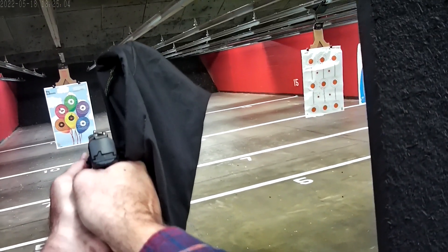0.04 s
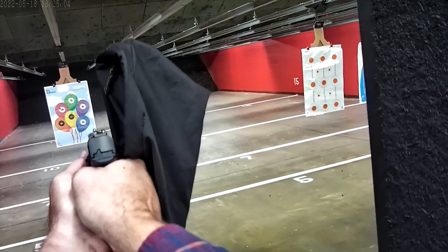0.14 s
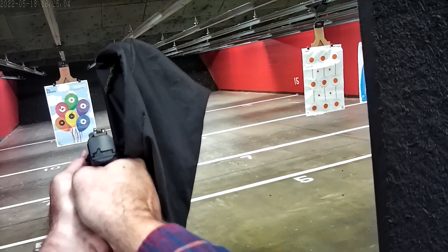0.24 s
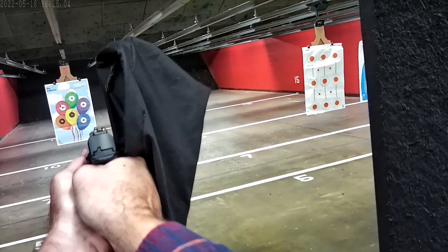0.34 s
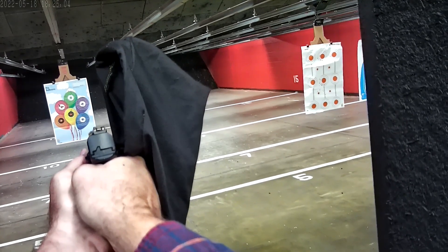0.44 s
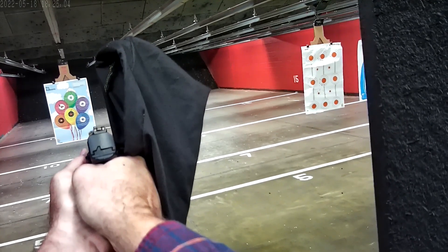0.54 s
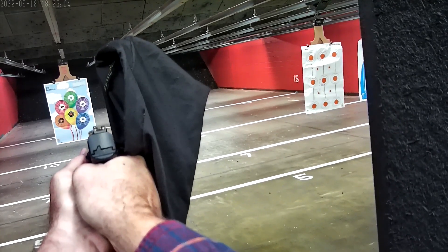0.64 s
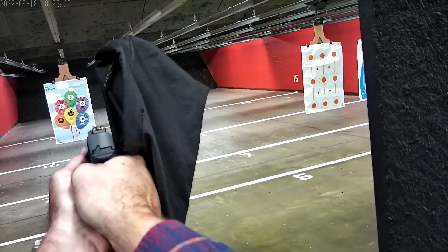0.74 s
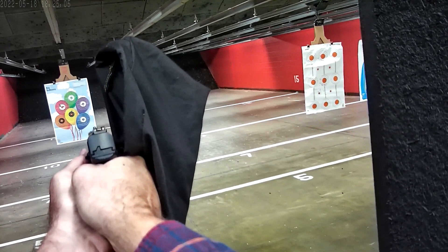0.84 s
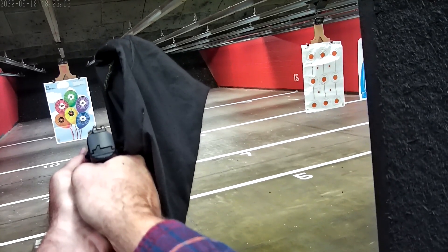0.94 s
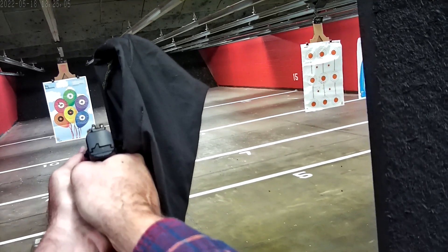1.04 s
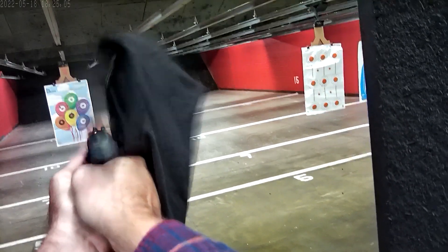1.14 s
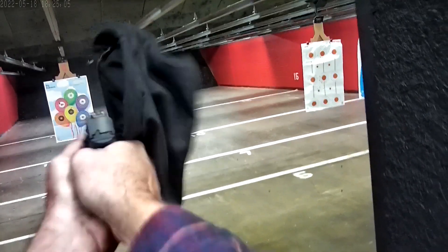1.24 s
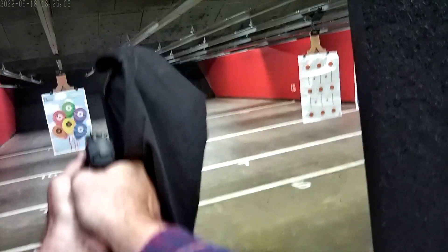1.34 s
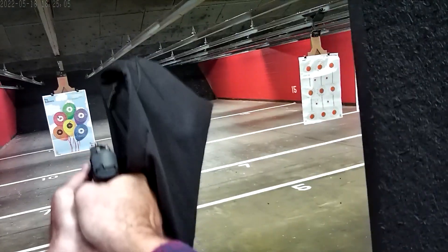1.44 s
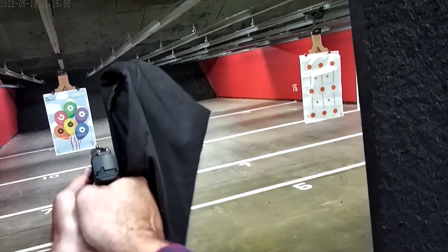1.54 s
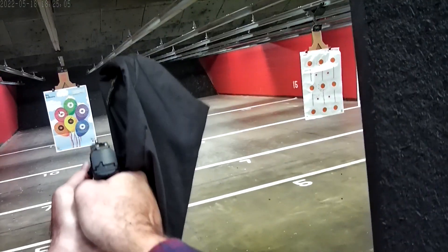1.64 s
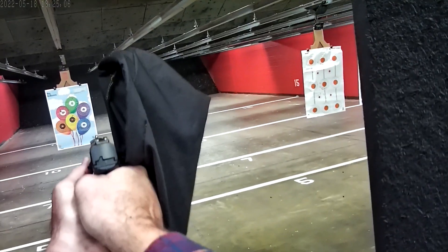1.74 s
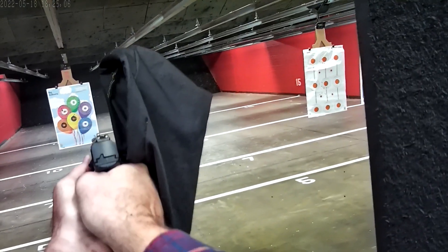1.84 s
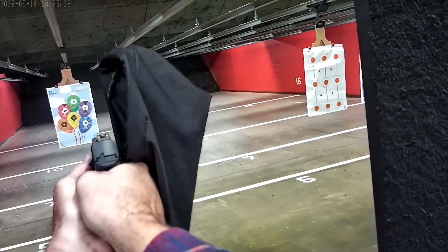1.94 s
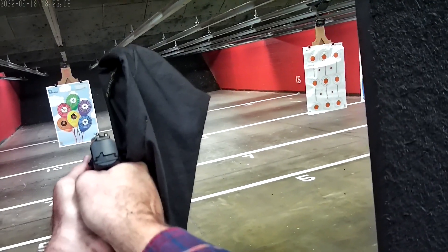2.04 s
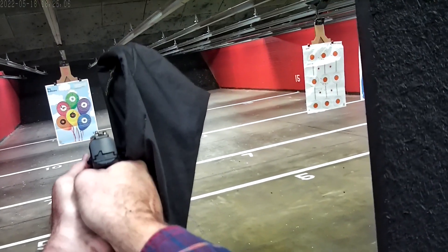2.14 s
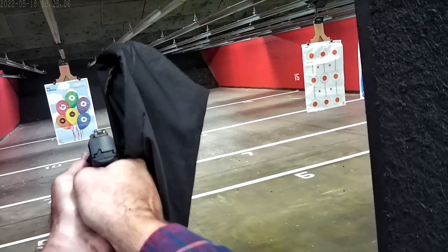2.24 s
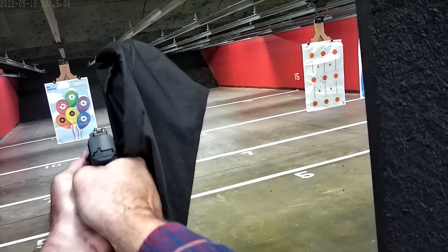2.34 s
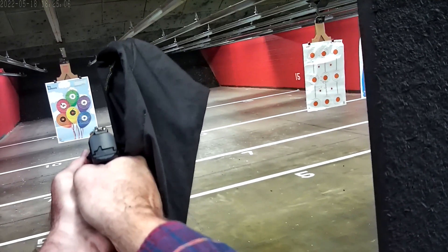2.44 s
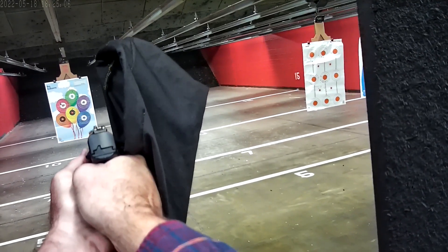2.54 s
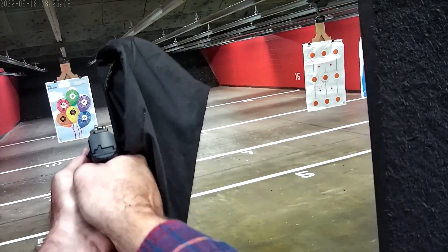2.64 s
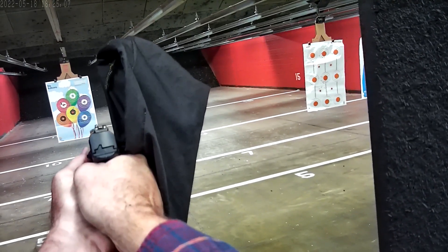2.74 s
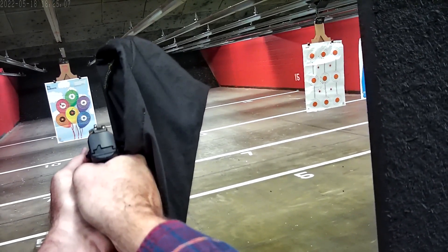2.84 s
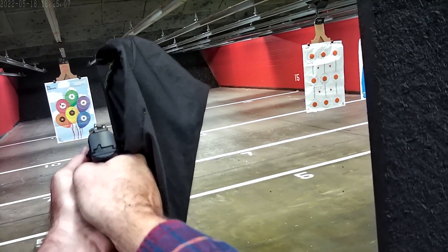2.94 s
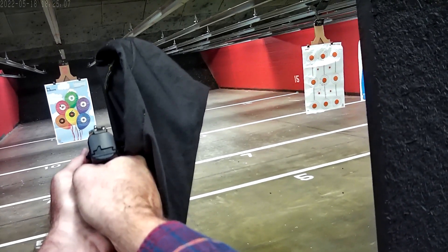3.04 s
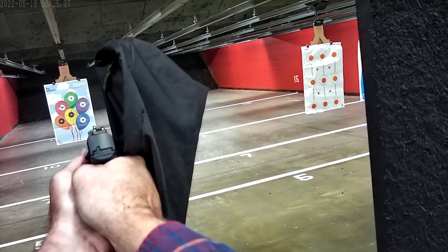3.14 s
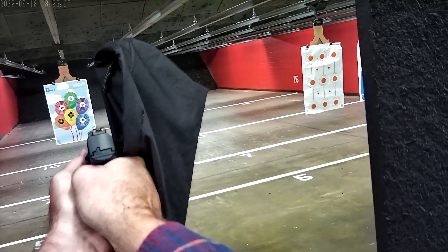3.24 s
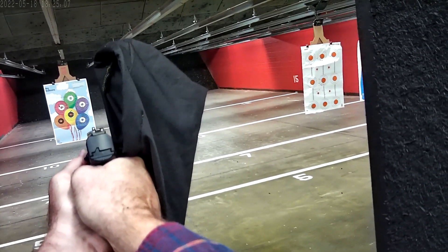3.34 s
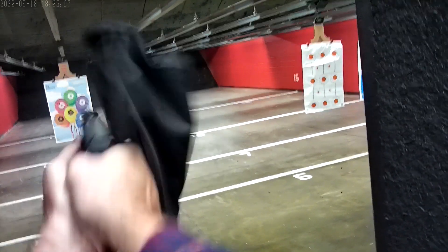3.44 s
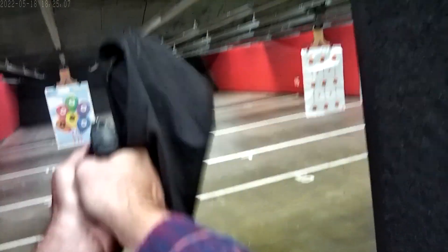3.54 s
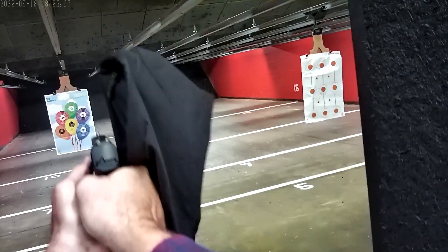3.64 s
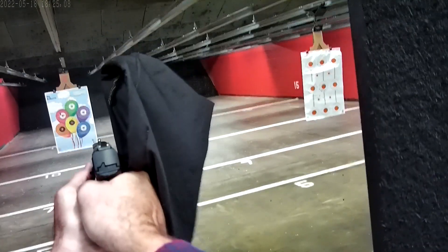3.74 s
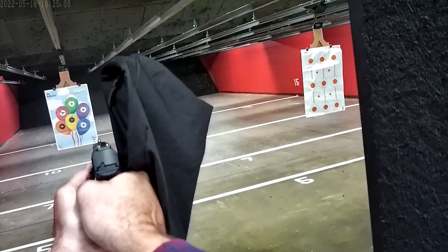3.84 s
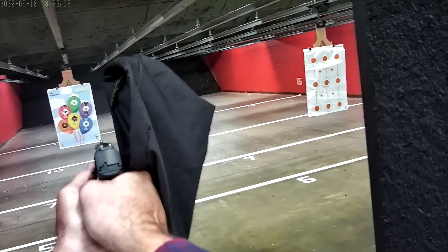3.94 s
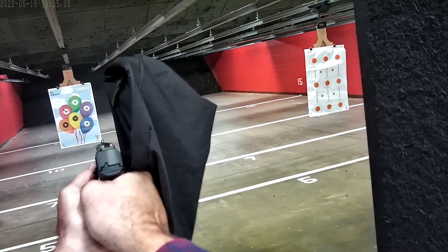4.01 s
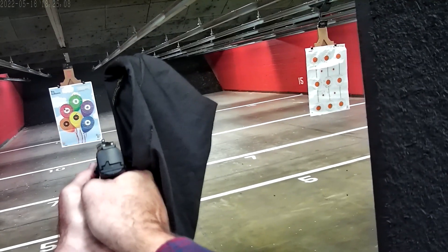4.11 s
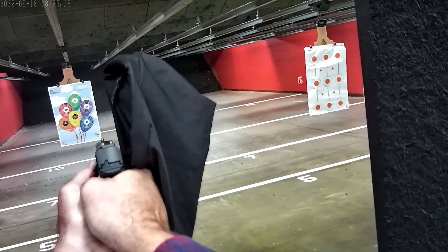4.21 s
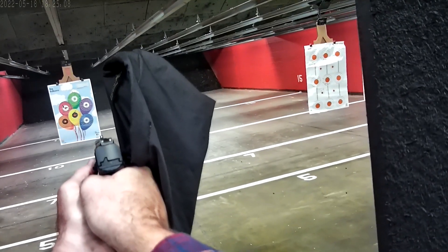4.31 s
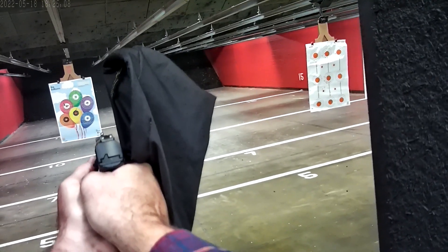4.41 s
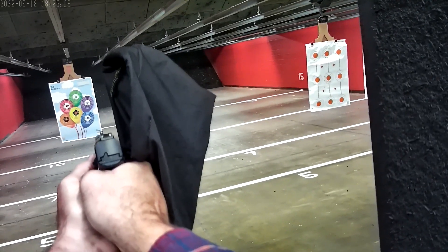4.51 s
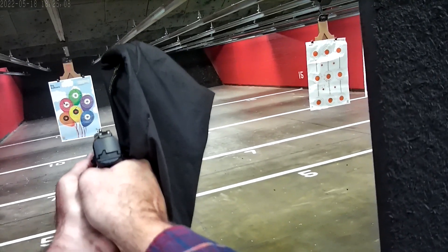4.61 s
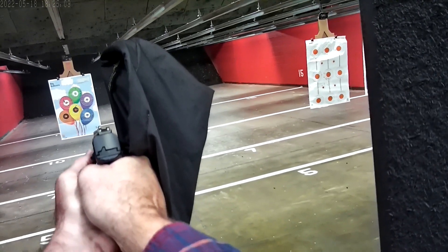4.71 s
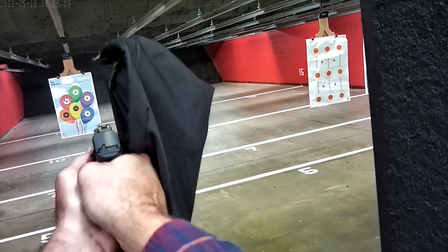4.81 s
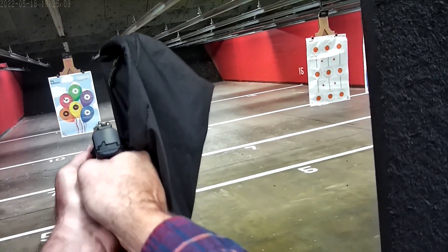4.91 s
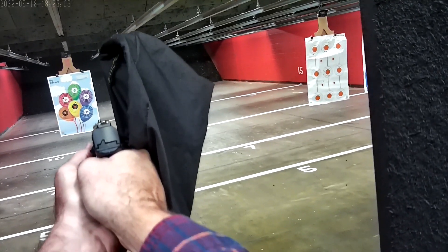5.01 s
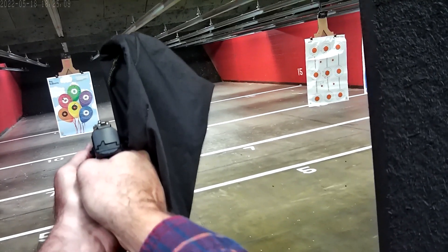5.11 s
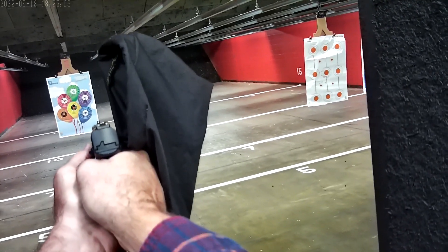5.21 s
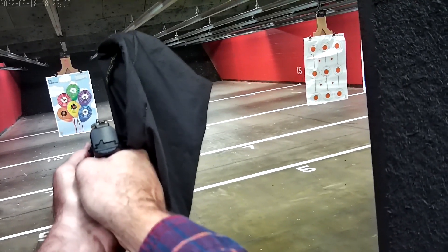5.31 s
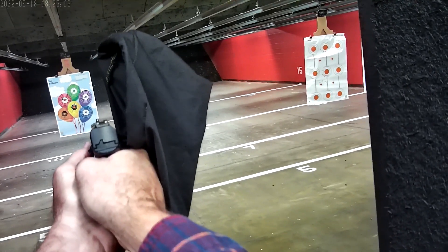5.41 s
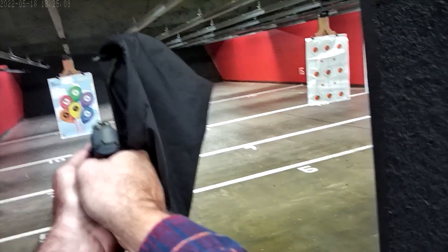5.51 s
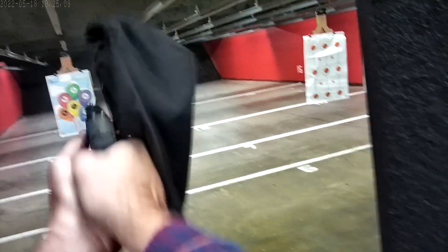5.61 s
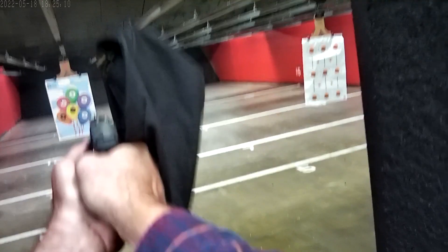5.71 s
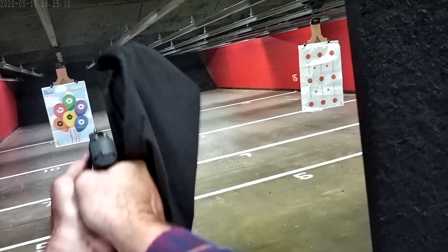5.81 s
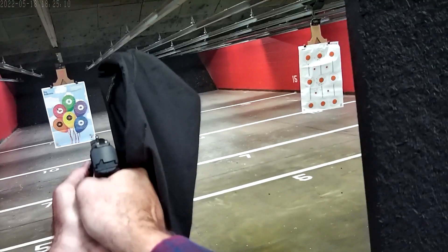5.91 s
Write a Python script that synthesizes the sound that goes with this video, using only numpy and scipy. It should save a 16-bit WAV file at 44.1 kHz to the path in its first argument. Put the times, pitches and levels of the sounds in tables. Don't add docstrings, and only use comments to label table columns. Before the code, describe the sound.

Close, overloaded microphone at a firing booth: two duller shots next door and one sharp handheld shot within the first second or so, another neighbour shot, a handheld shot, then a long pause of fading echo and bouncing brass before a final near-then-neighbour pair. Thick short booth reverb gives way to a slapping hall tail. Steady low air rush and faint hiss lie underneath.

```python
import sys
import numpy as np
from scipy import signal
from scipy.fft import rfft, irfft, next_fast_len
from scipy.io import wavfile
from scipy.ndimage import uniform_filter1d

SR = 44100
rng = np.random.default_rng(int(sys.argv[2]) if len(sys.argv) > 2 else 0)


def output_pcm(signal):
    pcm = np.clip(np.atleast_2d(signal).T, -1, 1) * 32767
    wavfile.write(sys.argv[1], SR, np.round(pcm).astype(np.int16))


def level_to_linear(level):
    exponent = np.asarray(level, float) / 20
    return 10 ** exponent


N = 262821
TIME = np.arange(N) / SR
COARSE = np.arange(0, N + 16, 16) / SR

# start in seconds, blast level in dB over the overload point,
# brightness in dB per octave (above 0 in the hands, below 0 hidden next door),
# hall level in dB, time the hall holds its level in seconds.
SHOTS = [
    (0.519, 7.7, -0.5, -29.5, 0.19),
    (0.672, 6.8, -0.36, -21, 0.4),
    (1.1222, 6.5, 1.1, -20.5, 0.45),
    (2.4269, 7.9, -0.39, -23, 0.59),
    (3.364, 7.85, 0.87, -20, 0.45),
    (5.5356, 6.6, 1.1, -27.5, 0.67),
    (5.696, 6.5, -0.43, -21, 0.75),
]


def table(points, hz):
    points = np.array(points)
    return np.interp(np.log(np.maximum(hz, 1)), np.log(points[:, 0]), points[:, 1])


def walk(rate):
    size = len(COARSE)
    hold = int(size / COARSE[-1] / rate)
    steps = np.repeat(rng.standard_normal(size // hold + 1), hold)
    smooth = uniform_filter1d(uniform_filter1d(steps, hold), hold)
    return 1.74 * smooth[:size]


def diffuse(colour, envelope):
    size = next_fast_len(N)
    hz = np.arange(size // 2 + 1) * SR / size
    noise = rfft(rng.standard_normal(size)) * level_to_linear(table(colour, hz))
    noise = noise / np.std(irfft(noise, size))
    place = 2 * np.log2(np.maximum(hz, 1) / 30)
    out = 0
    for k in range(19):
        overlap = np.maximum(1 - abs(place - k), 0)
        band = irfft(noise * overlap, size)[:N]
        out = out + band * np.interp(TIME, COARSE, envelope(30 * 2 ** (k / 2)))
    return out


def ring(x, hz, t60):
    pole = np.exp(2j * np.pi * hz / SR - np.log(1000) / (t60 * SR))
    return signal.lfilter([1], [1, -pole], x).imag


def since(s, clock=COARSE):
    return np.maximum(clock - s, 0), clock >= s


def ventilation():
    # frequency in Hz, level in dB per Hz.
    air_colour = [(18, -32.5), (30, -23.5), (50, -4.5), (76, -5), (165, -5), (246, -14), (460, -17),
                  (700, -19.5), (1900, -26), (2800, -42), (4500, -58.5), (7000, -86)]
    swell = walk(2.0)
    return level_to_linear(-46.5) * diffuse(air_colour, lambda hz: level_to_linear(0.4 * swell + 0.63 * walk(20)))


def hall():
    # frequency in Hz, level in dB per Hz.
    hall_colour = [(24, -29), (45, -1), (80, -1), (120, 3.5), (234, -16.5), (420, -11), (650, -15.5),
                   (1300, -7), (1800, -6.5), (2900, -27.5), (4000, -33), (5500, -50), (9500, -54),
                   (16000, -85)]
    # frequency in Hz, time to fade by 60 dB in seconds.
    hall_t60 = [(60, 2.5), (150, 1.1), (400, 1), (1500, 1.365), (4000, 1.93), (8000, 1.6), (14000, .7)]
    leftover_db = -48
    treble_hz, treble_early_db = 6500, 10.5
    linger_db, linger_tilt_db, linger_stretch = -20, -3, 2.8
    flutter_per_s, flutter_db = 16.2, 3.5
    first_bounce_s, flutter_grows_s = 0.021, 0.3
    slaps = 0.8 * walk(45)

    def envelope(hz):
        t60 = table(hall_t60, hz)
        power = level_to_linear(leftover_db - 60 * COARSE / t60) ** 2
        far = 1 / (1 + (hz / treble_hz) ** 4)
        mids = np.exp(-np.log2(hz / 1700) ** 2)
        octaves = np.log2(max(hz, 300) / 1000)
        for s, _, _, db, hold in SHOTS:
            t, gate = since(s)
            past = 0.052 * np.logaddexp(0, (t - far * hold) / 0.045)
            fill = (1 - np.exp(-t / (0.075 + 0.051 * mids))) ** 2
            level_db = db + treble_early_db * (1 - far) - 60 * past / t60
            late_db = db + linger_db + linger_tilt_db * octaves - 30 * (1 - far)
            late_db = late_db - 60 * far * (t - hold) / (linger_stretch * t60)
            bounce = np.cos(2 * np.pi * flutter_per_s * (t - first_bounce_s))
            bounce = bounce * (1 - np.exp(-(t / flutter_grows_s) ** 2))
            flutter = level_to_linear(flutter_db * bounce / (1 + (2500 / hz) ** 4))
            power = power + gate * (fill * flutter) ** 2 * (level_to_linear(level_db) ** 2 + level_to_linear(late_db) ** 2)
        return np.sqrt(power) * level_to_linear(slaps + 0.66 * walk(51))
    return diffuse(hall_colour, envelope)


def booths():
    # frequency in Hz, level in dB per Hz.
    booth_colour = [(24, -35.5), (40, -43), (116, -5.5), (220, -10), (420, -7), (1400, -6.5), (2100, -11.5),
                    (2900, -31.5), (5000, -30), (8000, -43), (11000, -36), (15000, -82.5)]
    # frequency in Hz, time to fade by 60 dB in seconds.
    booth_t60 = [(60, 2.2), (150, 0.8), (400, 0.61), (1200, 0.62), (4000, 0.44), (8000, 0.35),
                 (16000, 0.26)]
    near_stretch, hidden_stretch = 0.73, 0.84
    near_crack_db, near_crack_s = 22.5, 0.014
    hidden_dip_db, hidden_crack_s, hidden_fill_s = 24, 0.0037, 0.023
    flutter = 0.8 * walk(90)

    def envelope(hz):
        power = 0
        for s, db, bright_db, _, _ in SHOTS:
            t, gate = since(s)
            rise = 1 - np.exp(-(t + 1e-4) * hz / 1.8)
            if bright_db < 0:
                stretch = hidden_stretch
                dip = np.exp(-t / hidden_fill_s) * (1 - np.exp(-(t / hidden_crack_s) ** 2))
                crack_db = hidden_dip_db * bright_db * (hz / 1500) ** 0.26 * dip
            else:
                stretch = near_stretch
                crack_db = near_crack_db * bright_db * np.exp(-t / near_crack_s)
            fall_db = crack_db - 60 * t / (stretch * table(booth_t60, hz))
            level_db = db + bright_db * np.log2(hz / 1000) + fall_db
            power = power + gate * (rise * level_to_linear(level_db)) ** 2
        return np.sqrt(power) * level_to_linear(flutter)
    return diffuse(booth_colour, envelope)


def shoves():
    # blast time in seconds, shove level in dB, striker level in dB.
    near_shots = [
        (1.1225, -25, -44),
        (3.3648, -8, -11.5),
        (5.5364, -6.5, -12.5),
    ]
    out = 0
    for s, db, striker_db in near_shots:
        t, _ = since(s, TIME)
        click_t, _ = since(s - 0.004, TIME)
        out = out - level_to_linear(db) * np.sin(2 * np.pi * 30 * t) * np.exp(-t / 0.022)
        out = out - level_to_linear(striker_db) * np.sin(2 * np.pi * 1900 * click_t) * np.exp(-click_t / 0.0017)
    return out


def knocks():
    # start in seconds, level in dB, rattle length in seconds, room level in dB,
    # brightness in dB per octave.
    case_knocks = [
        (1.6134, -6, 0.0058, -14.5, 4),
        (2.937, -5.5, 0.0045, -17.5, 2.7),
        (4.4946, -5, 0.0053, -15, 3),
    ]
    # frequency in Hz, level in dB, time to fade by 60 dB in seconds.
    partition = [(460.5, -4.5, 0.051), (1309, -2.5, 0.028), (1840, -10.5, 0.02), (2180, -2.5, 0.0063),
                 (3470, -16.5, 0.0086), (5940, -20, 0.0072), (8360, -14.5, 0.0037), (10400, -20, 0.01),
                 (11300, -24.5, .008)]
    # frequency in Hz, level in dB per Hz.
    room_colour = [(35, -19), (70, 6.5), (140, -1.5), (280, -19.5), (400, -7.5), (760, -15.5), (1150, -8.5),
                   (2200, -18.5), (3000, -27.5), (6000, -37.5), (10400, -39.5), (16000, -51)]
    panel, grit = 0, rng.standard_normal(N)
    for s, db, length, _, bright_db in case_knocks:
        t, _ = since(s, TIME)
        force = level_to_linear(db - 24.0) * grit * (t / length) ** 2 * np.exp(2 - 2 * t / length)
        for k, (hz, mode_db, t60) in enumerate(partition):
            tilt_db = bright_db * np.log2(hz / 1250) if k < 5 else 0
            panel = panel + level_to_linear(mode_db + tilt_db) * ring(force, hz, t60)
    panel = signal.lfilter(*signal.butter(2, 300, "high", fs=SR), panel)

    def envelope(hz):
        late = 0.0019 + 0.049 / (1 + (hz / 170) ** 4)
        t60 = 0.41 / (1 + hz / 30000)
        out = 0
        for s, _, _, room_db, _ in case_knocks:
            t, _ = since(s)
            out = out + level_to_linear(room_db - 60 * t / t60) * (1 - np.exp(-t / late)) ** 3
        return out
    return panel + diffuse(room_colour, envelope)


def cases():
    # start in seconds, level in dB.
    rim_bounces = [(1.745, -65), (2.07, -71), (2.125, -71), (3.291, -63), (3.324, -64), (4.04, -52.5),
                   (4.549, -53.5), (4.84, -63), (4.963, -69), (5.185, -74), (5.255, -73), (5.33, -77)]
    side_bounces = [(2.105, -66), (2.14, -72)]
    base_bounces = [(1.89, -49), (3.22, -62), (3.291, -64), (4.04, -68), (4.794, -56.5), (4.84, -53),
                    (5.075, -64.5)]
    mouth_bounces = [(1.89, -66), (4.454, -52), (4.793, -56), (4.964, -45.5)]
    # frequency in Hz, time to fade by 60 dB in seconds.
    brass_modes = [(10140, 0.26), (10205, .15), (10820, 0.22)]
    hits = np.zeros((4, N))
    for row, bounces in zip(hits, (rim_bounces, side_bounces, base_bounces, mouth_bounces)):
        for s, db in bounces:
            row[int(s * SR)] = level_to_linear(db)
    rim, side, base, mouth = hits
    brass = 0
    for strike, (hz, t60) in zip((rim, rim, side), brass_modes):
        soft_strike = ring(strike, hz, 0.021) / 38
        brass = brass + ring(soft_strike, hz, t60)
    tumble = np.interp(TIME, COARSE, 1 + 0.45 * walk(120))
    echo = signal.lfilter([1], [1, -np.exp(-1 / (0.017 * SR))], mouth) * rng.standard_normal(N)
    clack = ring(ring(echo, 4300, 0.0039), 4400, 0.0038) / 70
    tick = 2.1 * ring(base, 6000, 0.0014)
    return brass * tumble + clack + tick


def pings():
    # start in seconds, frequency in Hz, level in dB.
    first_landings = [(3.58, 12800, -67), (3.59, 11450, -66), (3.65, 12300, -59), (3.657, 10820, -55),
                      (3.70, 10400, -66)]
    t60 = 0.089
    out = 0
    for s, hz, db in first_landings:
        t, _ = since(s, TIME)
        out = out + level_to_linear(db - 60 * t / t60) * (1 - np.exp(-t / 0.004)) * np.sin(2 * np.pi * hz * t)
    return out


def scene():
    return (ventilation() + hall() + booths() + knocks() + cases() + pings())[None]


def top_cut(x):
    return signal.sosfilt(signal.butter(12, 15800, fs=SR, output="sos"), x)


def record(dry):
    # frequency in Hz, width in Hz, level in dB.
    cavity = [(3993, 550, 12.5), (5310, 1500, -7.5), (6100, 420, 9)]
    for hz, width, db in cavity:
        dry = dry + (level_to_linear(db) - 1) * signal.lfilter(*signal.iirpeak(hz, hz / width, fs=SR), dry)
    top, knee = 0.62, 9.0
    flat = dry / (1 + abs(dry / top) ** knee) ** (1 / knee)
    sag = signal.lfilter(*signal.butter(1, 165, "high", fs=SR), flat + shoves())
    loudness = signal.lfilter(*signal.butter(1, 20, fs=SR), sag ** 2)
    held = 1.384 * sag / (1 + 1.06 * loudness)
    hiss = signal.lfilter(*signal.butter(2, 15000, fs=SR), rng.standard_normal(dry.shape))
    soft = signal.lfilter(*signal.butter(1, 16000, fs=SR), held)
    mix = np.clip(soft + level_to_linear(-69.5) * hiss, -1, 1)
    return top_cut(mix)


dry = scene()
out = record(dry)
output_pcm(out)
```